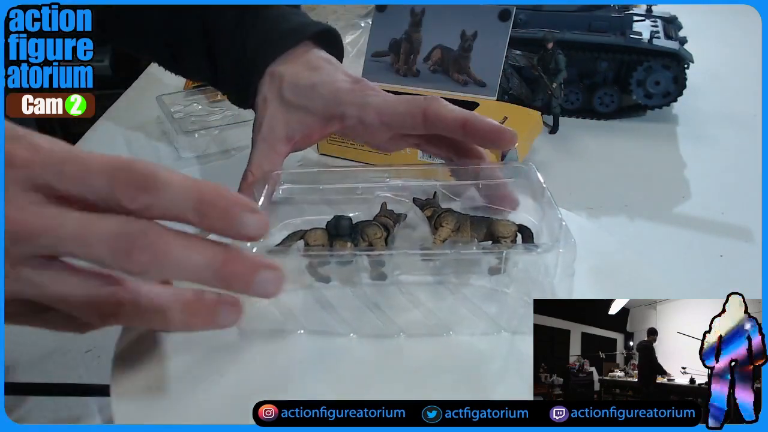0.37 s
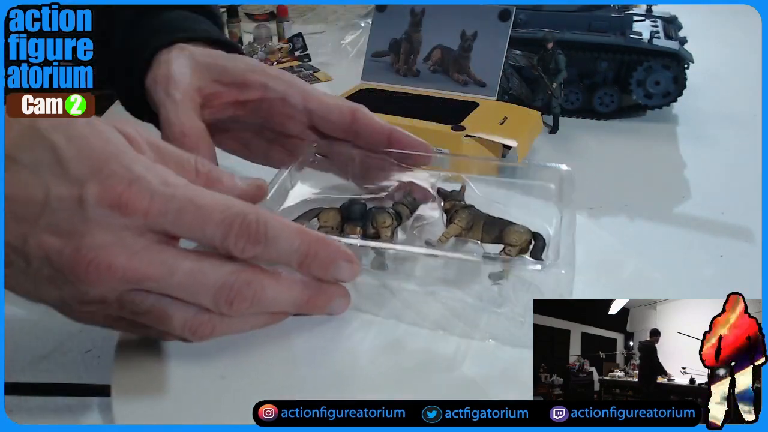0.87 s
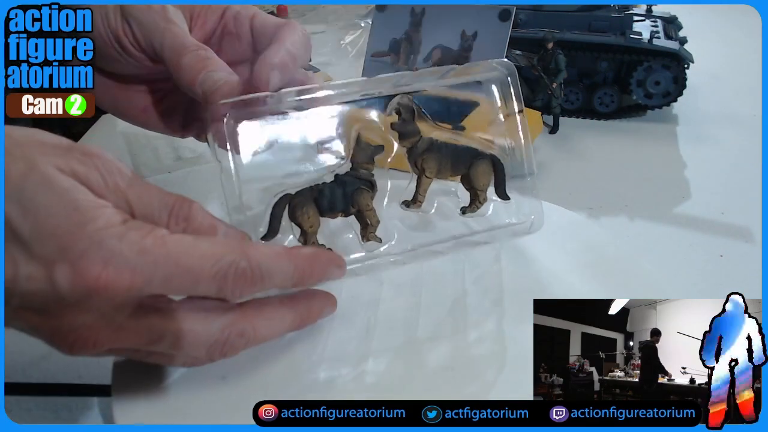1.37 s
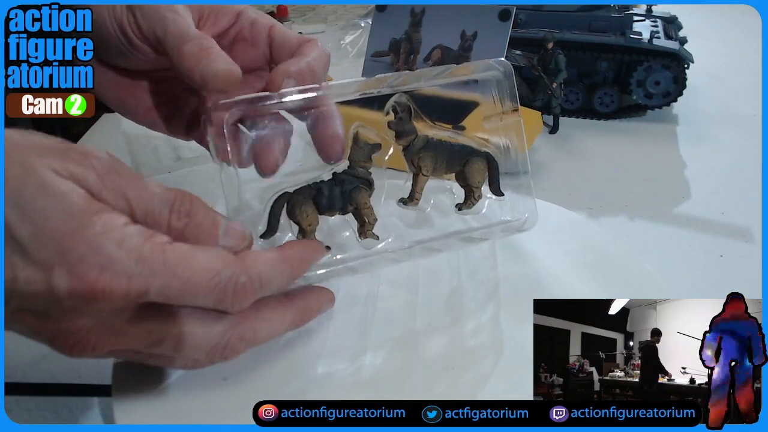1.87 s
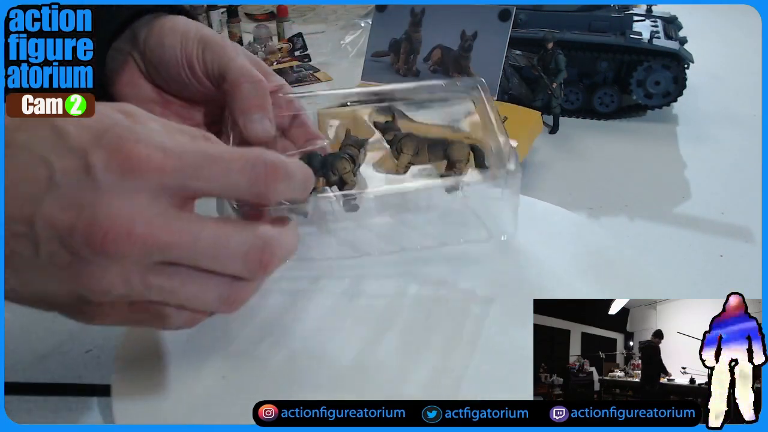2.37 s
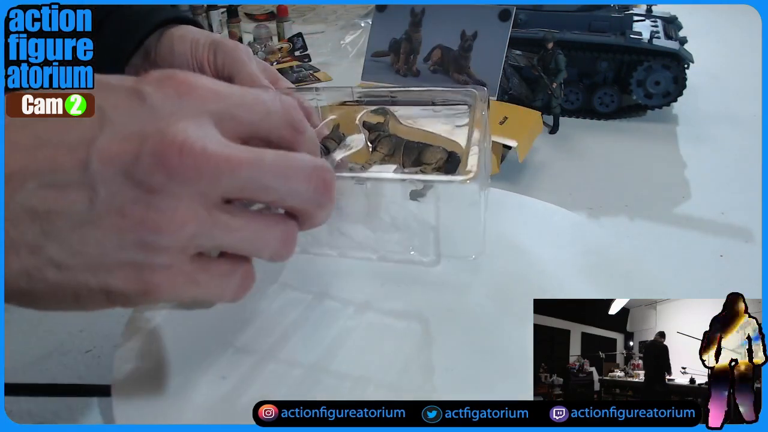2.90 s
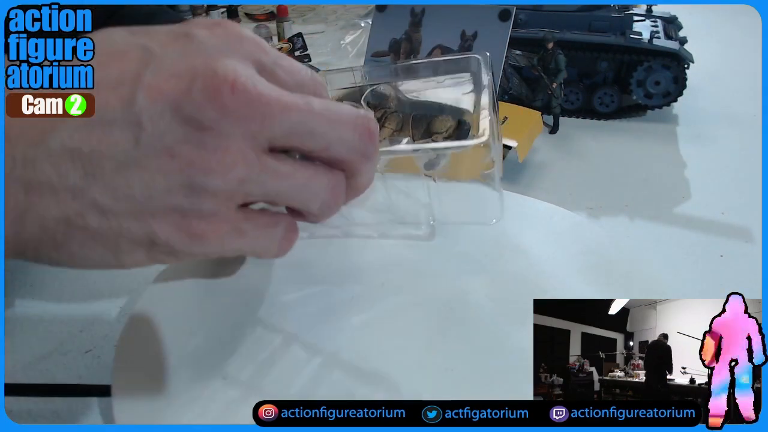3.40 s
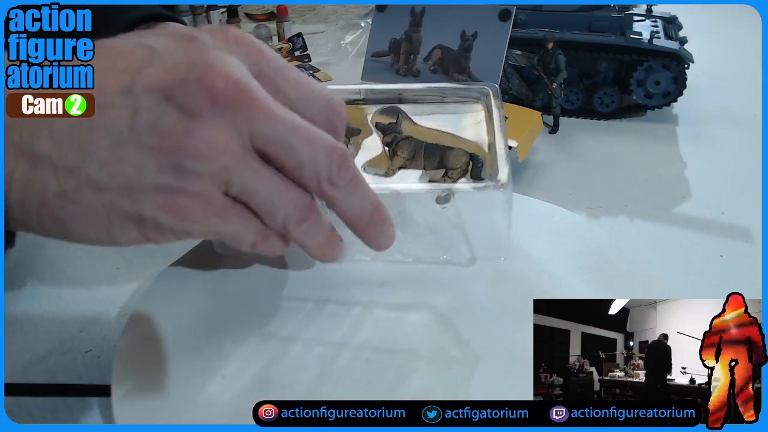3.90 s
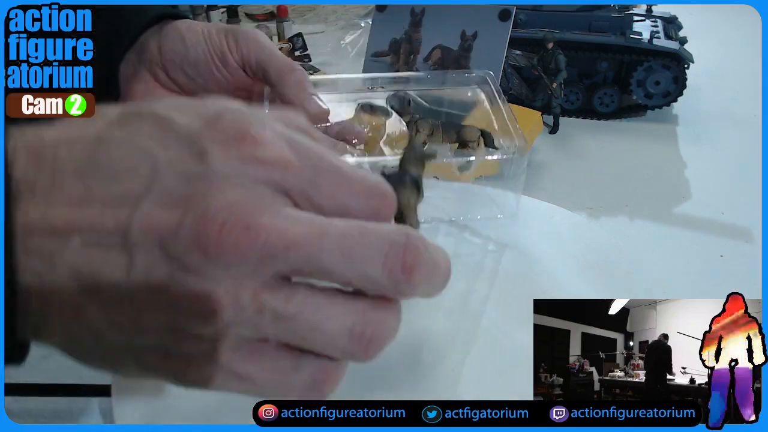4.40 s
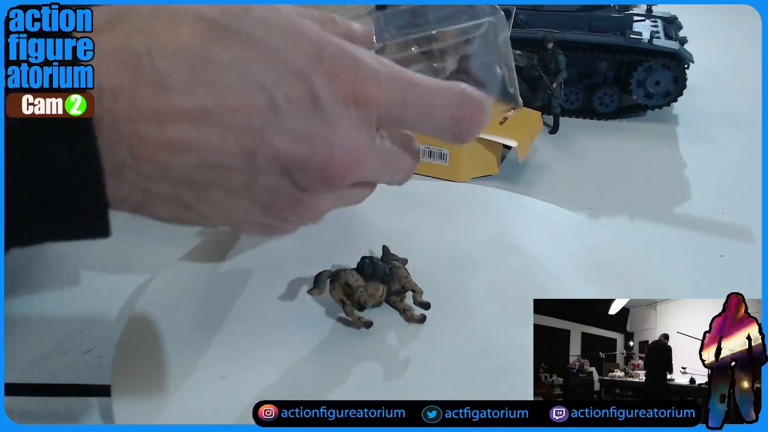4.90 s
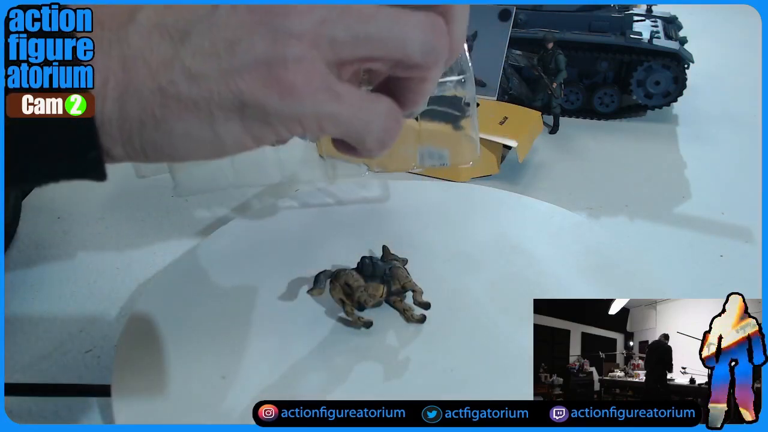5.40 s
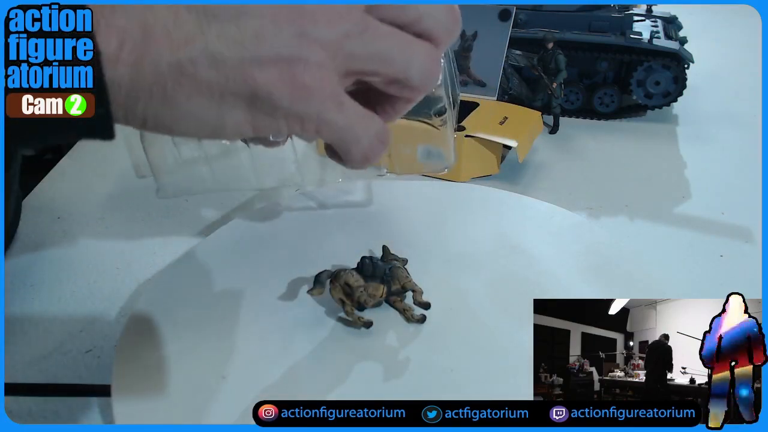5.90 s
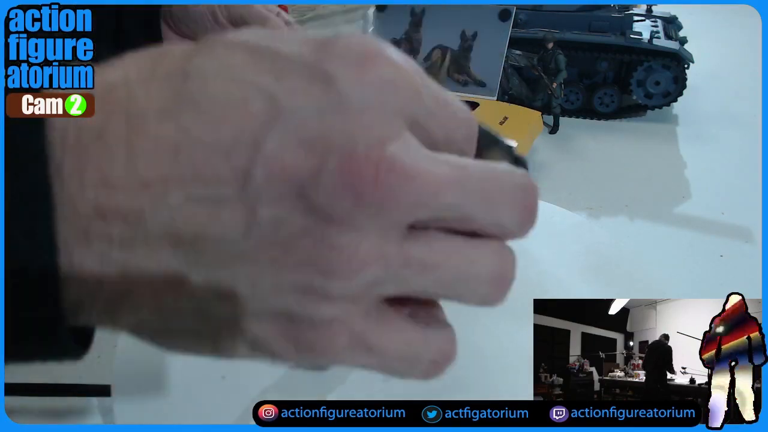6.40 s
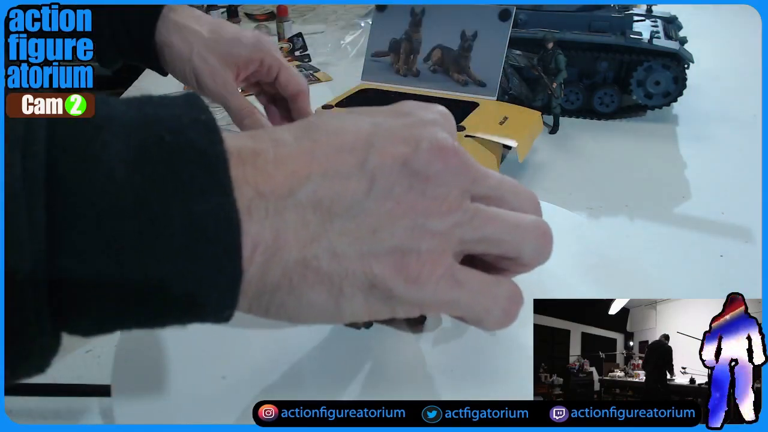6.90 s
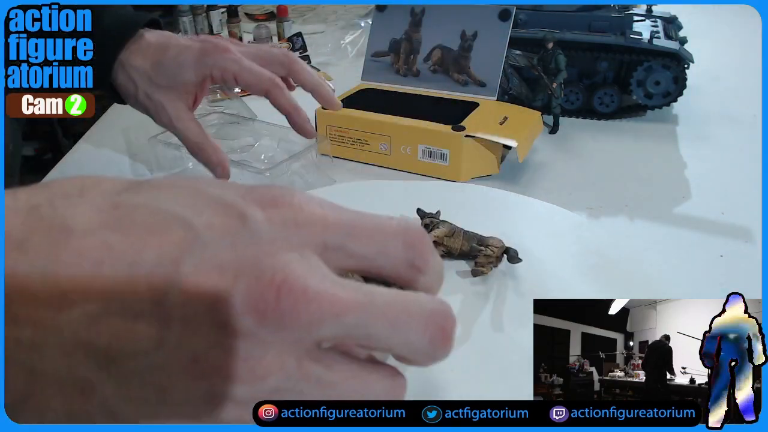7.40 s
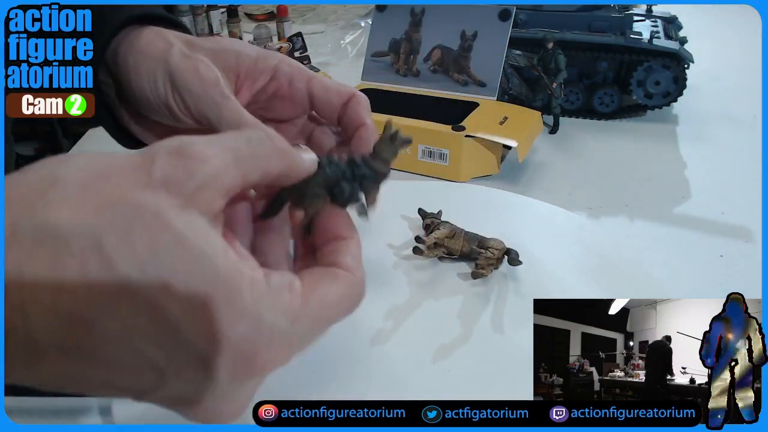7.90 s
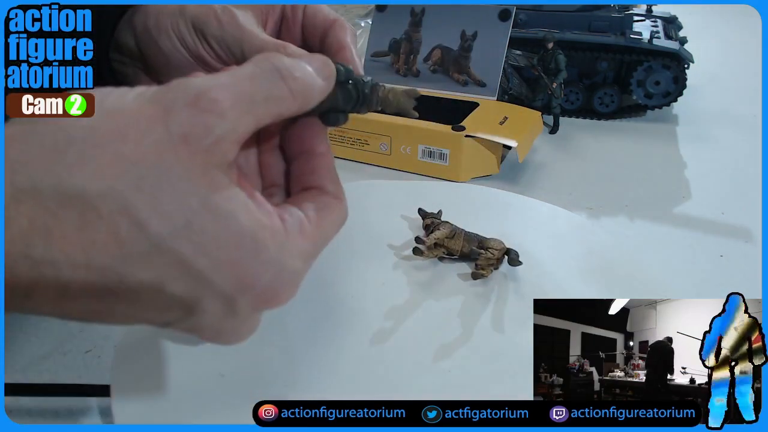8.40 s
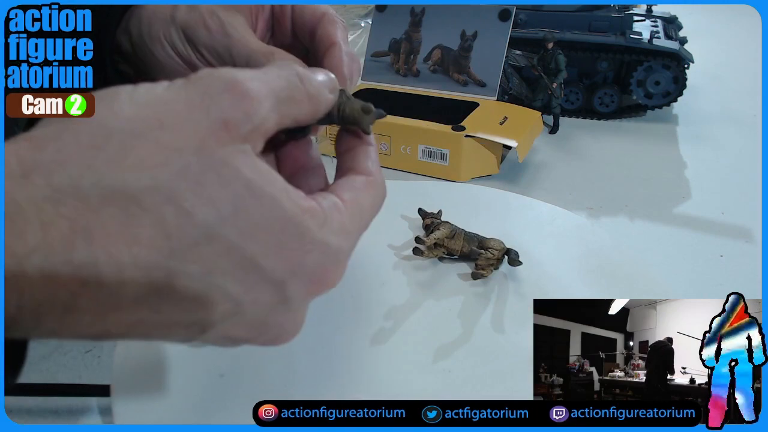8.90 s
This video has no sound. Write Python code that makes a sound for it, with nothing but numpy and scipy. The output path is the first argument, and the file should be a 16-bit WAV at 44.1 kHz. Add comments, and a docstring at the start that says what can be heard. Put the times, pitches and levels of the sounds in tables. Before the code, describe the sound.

Fingers slide over flimsy clear packaging with soft rustling, then flex it into rapid, brittle pops that grow loudest near the middle. A toy is set down with a small hard knock; the tray crackles again with a tiny squeak and its strongest snap. Duller table bumps and scrapes follow, then near quiet with tiny ticks over low hum and hiss, in a small, dry room.

```python
"""A thin moulded plastic tray, flexed by hand over a table close to one microphone, buckles in sharp cracks.
Each crack is a burst of decaying sheet modes; sliding fingers rustle as dense random slips through the same modes.
Small figures are pried out: a stick-slip tone squeaks, table modes knock and a joint ticks in short treble rings.
A small room answers with two wall echoes and a diffuse noise tail.
Behind it lie rumble and hiss made of coloured noise, and a distant hum, a sine that sinks in pitch."""
import sys
import numpy as np
from scipy import signal
from scipy.fft import rfft, irfft
from scipy.io import wavfile

SR = 44100
rng = np.random.default_rng(int(sys.argv[2]) if len(sys.argv) > 2 else 0)


def dump(signal):
    """Clip the signal to [-1, 1] and save it as 16-bit WAV at the path in sys.argv[1]."""
    limited = np.clip(np.atleast_2d(signal).T, -1, 1)
    pcm = np.round(limited * 32767).astype(np.int16)
    wavfile.write(sys.argv[1], SR, pcm)


def voltage_ratio(level):
    """Linear amplitude factor for a level in decibels (scalar or array-like)."""
    return 10 ** (np.asarray(level, float) / 20)


N = 398654
TIME = np.arange(N) / SR


def level(x, db):
    """Scales x to an rms level in dB."""
    return x * voltage_ratio(db) / np.sqrt(np.mean(x ** 2))


def on_log(hz, table):
    """Reads (frequency [Hz], value) points on a log-frequency axis."""
    points_hz, values = np.transpose(table)
    return np.interp(np.log(hz), np.log(points_hz), values)


def coloured(size, table):
    """Noise with the spectrum of (frequency [Hz], level [dB per Hz]) points."""
    hz = np.maximum(np.arange(size // 2 + 1) * SR / size, 1)
    return irfft(rfft(rng.standard_normal(size)) * voltage_ratio(on_log(hz, table)), size)


def walk(per_s):
    """Random levels joined by straight lines."""
    knots = np.arange(0, N / SR + 1, 1 / per_s)
    return 0.84 * np.interp(TIME, knots, rng.standard_normal(len(knots)))


def ring(hz, db, t60, phase, seconds, push_s):
    """Sum of decaying modes that swell during the contact, peak 1."""
    t = np.arange(int(seconds * SR))[:, None] / SR
    modes = voltage_ratio(db - 60 * t / t60) * np.sin(2 * np.pi * hz * t + phase)
    y = modes.sum(axis=1)
    y *= np.sin(np.pi / 2 * np.minimum(t[:, 0] / push_s, 1)) ** 2
    return y / np.abs(y).max()


def add(out, s, y):
    """Lays y into out from time s [s] on."""
    i = int(s * SR)
    out[i:i + len(y)] += y[:len(out) - i]


FOCUS_DB = 5  # loss half an octave away from the centre


def focus(hz, centre_hz):
    """Level [dB] of a mode against one at the centre of the ring: the loss grows with distance, up to a limit."""
    return -FOCUS_DB * np.minimum(4 * np.log2(hz / centre_hz) ** 2, 2.5)


# buckles of the sheet, close to the microphone, treble and edge (3.4-5.4 kHz) before the offsets in cracks():
# (time [s], peak [dB], centre of the ring [Hz], edge [dB], treble [dB])
BUCKLES = [(0.3988, -44, 2130, -9, -19), (0.4145, -31, 2700, -14, -14), (0.9126, -38, 2470, -3, -3),
           (1.3332, -36, 2250, -18, -5), (1.492, -45, 2300, -15, -15), (1.915, -53, 1900, -15, -20),
           (2.2363, -49, 1980, -24, -15), (2.2513, -45, 1980, -23, -13), (2.2734, -31.5, 1830, -6, -12),
           (2.5325, -47, 2050, -18, -9), (2.5776, -42, 1920, -7, -3), (2.789, -34.5, 2470, -5, -13),
           (2.8783, -23, 2660, 1, -5.5), (3.0032, -40, 1570, -31, -30), (3.12, -38, 1970, -20, -16),
           (3.1349, -33, 1960, -9, -18), (3.15, -29, 1970, -7, -15), (3.1646, -30, 1930, -2, -20),
           (3.174, -30, 2020, -7, -15), (3.1912, -34, 1840, -3.5, -18), (3.2015, -36.5, 2550, -9, -14),
           (3.209, -33, 2010, -4, -5), (3.2412, -37, 1640, -9, -12), (3.2637, -26.5, 1530, 12, 6),
           (3.347, -40, 1550, -11, -20), (3.4207, -31.5, 2360, -9, 3.5), (3.4393, -32.5, 1870, -22, -13),
           (3.4513, -33, 1840, -21, -25), (3.4687, -23.5, 2900, -10, -4), (3.4853, -27.5, 1720, -12, -8),
           (3.6252, -35.5, 2460, -15, -11), (3.6408, -24, 2700, -11, -2.5), (3.6719, -27, 2450, 6, 1.5),
           (3.7183, -35.5, 1640, -5, -12), (3.729, -41, 2310, -7, -15), (3.746, -33, 1930, -18, -16),
           (3.7587, -23, 2050, -1, -2.5), (3.813, -40, 1930, -7, -5), (3.84, -30, 2770, 0, -2),
           (3.8646, -28.5, 2000, 2, 1), (3.8808, -30.5, 2150, 1, 6), (3.932, -16.5, 2620, -2, -8),
           (3.9468, -17, 2150, -1, 3.5), (3.9782, -26, 2080, -24, -27), (4.1267, -48, 1650, -20, -21),
           (4.3197, -42, 1770, -11, -21), (4.5543, -26, 1490, -4, -15), (4.6808, -40.5, 1500, 1, 1.5),
           (4.6962, -49, 1380, -7, 7), (4.7291, -25, 2240, -7.5, -19), (4.892, -39, 1750, -22, -16),
           (4.9103, -43, 1780, -23, -1), (4.9607, -41, 2280, -11, -9), (4.978, -35.5, 2090, -16, -18),
           (5.157, -37, 1910, -23, -7), (5.3351, -46, 2280, -18, -16), (5.3775, -44, 2240, -25, -14),
           (5.4608, -40, 1380, -29, -22), (5.5428, -34, 2400, -29, -20), (5.5709, -33, 1860, -20, -20),
           (5.6002, -32.5, 2420, -4, -11), (5.6265, -32.5, 1330, -19, -34), (5.65, -32, 2660, -5, -3),
           (5.691, -37, 1690, -16, -17), (5.7077, -26, 2100, -15, -20), (5.7165, -24.5, 2000, 7.5, 4),
           (5.7459, -38, 1600, -11, -25), (5.791, -48, 2230, -21, -30), (5.8036, -23, 1790, -6.5, -17),
           (5.8279, -32.5, 2350, -22, -16), (5.8795, -33, 1940, -13, -22), (5.9293, -44, 1990, -32, -35),
           (5.938, -44.5, 1980, -23, -34), (5.9441, -45, 1953, -20, -26), (5.9509, -11, 2970, -6, -13),
           (6.0023, -15, 2160, -21, 0.5), (6.014, -28, 2120, -19, -25), (6.0219, -19.5, 2460, -3, -4),
           (6.3156, -36, 1910, -13, -14), (6.4121, -36, 2000, -28, -11), (6.4607, -48, 1900, -14, -10),
           (6.496, -45, 1920, -13, 2), (6.56, -43, 1800, -22, -21), (6.6962, -25.5, 1836, -17, -30),
           (6.829, -19.5, 1310, -31, -36), (6.8705, -33, 1075, -11, -19), (6.9164, -33, 1382, -32, -22),
           (6.9408, -27.5, 1480, -16, -33), (6.958, -41, 1397, -28, -16), (7.045, -39.5, 1930, -4, -23),
           (7.0728, -44, 1340, -27.5, -28)]
# modes of the plastic sheet: (frequency [Hz], relative level [dB], t60 [s])
SHEET_MODES = [(494, 3, 0.0085), (680, 1.5, 0.019), (820, 2.5, 0.016), (1010, -4.5, 0.0219),
               (1227, 4.5, 0.017), (1480, -2.5, 0.034), (1870, 4, 0.008), (2080, 5, 0.013),
               (2400, -2, 0.023), (2713, 2, 0.011), (3018, 1, 0.018), (3580, -0.5, 0.0072),
               (4310, -1.5, 0.0099), (5060, -10.5, 0.014), (5940, -7, 0.01), (6550, -3, 0.0049),
               (7870, -6.5, 0.01), (8800, -4, 0.0073), (9760, -3.5, 0.003), (11530, -12.5, 0.016),
               (11790, -4, 0.0049), (14800, -16, 0.015)]
# a big facet rings low: modes under 1.1 kHz lose level as the centre rises above 1.5 kHz,
# and for each dB of peak above -30 dB
LOW_DB_PER_OCTAVE, LOW_DB_PER_DB = -12.5, -0.62
# faint crackle while the sheet is rubbed: dB over the rub's middle range, scale of its random excess in dB
CRACKLE_DB, CRACKLE_SPREAD_DB = 3, 2.5
SCATTER_DB = 2.5  # random spread of each mode's level


def cracks(rub_db, detune=0.054, edge_db=3.0, treble_db=5.5, low_db=-11.5, count=110):
    """Each buckle snaps another facet: every mode splits in three, shifted; middle ones near its centre lead."""
    out = np.zeros(N)
    hz, db, t60 = np.repeat(np.transpose(SHEET_MODES), repeats=3, axis=1)
    when = rng.random(count) * TIME[-1]
    excess_db = CRACKLE_SPREAD_DB * rng.exponential(size=count)
    centre, edge, treble = rng.standard_normal((count, 3)).T
    crackle_db = np.interp(when, TIME, rub_db) + CRACKLE_DB + excess_db
    crackle = zip(when, crackle_db, 1900 * 2 ** (0.076 * centre), -14 + 7 * edge, -14 + 7 * treble)
    rows = list(BUCKLES) + list(crackle)
    chance = rng.standard_normal((len(rows), 3, len(hz)))
    ranges = [hz < 1100, hz < 3400, hz < 5400]  # low, middle, edge; the rest is treble
    for (s, peak_db, centre_hz, edge, treble), (scatter, shift, phase) in zip(rows, chance):
        low = LOW_DB_PER_OCTAVE * np.log2(centre_hz / 1500) + LOW_DB_PER_DB * (peak_db + 30)
        range_levels = [low + low_db, focus(hz, centre_hz), edge + edge_db]
        colour_db = np.select(ranges, range_levels, treble + treble_db)
        gains_db = db + colour_db + SCATTER_DB * scatter
        facet = ring(hz * (1 + detune * shift), gains_db, t60, np.pi * phase, 0.036, 0.00065)
        add(out, s, voltage_ratio(peak_db) * facet)
    return out


def shelves(hz):
    """Share of a mode in the treble and in the low range of the sheet."""
    high = np.clip(np.log2(hz / 3300) / 0.33, 0, 1)
    low = np.clip(np.log2(1150 / hz) / 0.53, 0, 1)
    return high, low


def rubbed(slips, hz, t60):
    """One mode, a two-pole resonator, driven by the slips, each with a force of its own; rms 1."""
    pole = np.exp(-np.log(1000) / (t60 * SR))
    force = slips * rng.standard_normal(N)
    return level(signal.lfilter([1], [1, -2 * pole * np.cos(2 * np.pi * hz / SR), pole ** 2], force), 0)


SLIPS_PER_S, SLIP_SPREAD_DB = 3000, 2.5
FLEX_DB = 3.5  # depth of each mode's random rise and fall
# a brighter rub rings higher: centre [Hz] where treble equals middle, [Hz] per dB of treble over middle
BRIGHT_HZ, HZ_PER_DB = 3000, 60


def rustle(body, bright, deep, sheet_db=-13.5, treble_db=-5.5, low_db=-14.5, table_db=-15.5):
    """Dense tiny slips of skin and table on plastic ring the sheet; their low part goes into the table top."""
    centre_hz = np.maximum(BRIGHT_HZ + HZ_PER_DB * (bright - body), 1100)
    slips = (rng.random(N) < SLIPS_PER_S / SR) * voltage_ratio(SLIP_SPREAD_DB * rng.exponential(size=N))
    sheet = np.zeros(N)
    for hz, db, t60 in SHEET_MODES:
        high, low = shelves(hz)
        middle = body + sheet_db + 0.52 * focus(hz, centre_hz)
        gain_db = db + (1 - high - low) * middle + high * (bright + treble_db) + low * (deep + low_db)
        damped_t60 = t60 * (1 - .6 * high)  # the fingers damp the upper modes
        mode = rubbed(slips, hz, damped_t60)
        # as the sheet flexes, each mode comes forward and steps back
        sheet += mode * voltage_ratio(gain_db + FLEX_DB * (1 - high / 2) * walk(25))
    board = np.zeros(N)
    for hz, db, t60 in TABLE_MODES[1:]:  # all but the deepest
        board += voltage_ratio(db + focus(hz, 900)) * rubbed(slips, hz, t60)
    return sheet + board * voltage_ratio(table_db + deep)


# the tray jolts, scrapes briefly and settles; levels drive the rustle, treble and low against the level:
# (time [s], hold [s], level [dB], treble [dB], low [dB])
JOLT_EVENTS = [(.405, 0.089, -39, -14.5, -11), (.69, 0.013, -38, -20.5, -9),
               (2.262, 0.021, -46, -14.5, -12), (2.858, .01, -51, -18, -3),
               (3.625, 0.11, -47.5, -15.5, -11.5), (3.748, 0.01, -44.5, -19, -27),
               (3.932, 0.038, -42.5, -16, -35), (4.556, 0.0055, -53, -12, 7), (4.731, 0.014, -51, -20, -2),
               (4.89, .012, -51, -15, -0.5), (4.965, 0.038, -51.5, -17, -5),
               (5.156, 0.015, -50, -13.5, -3.5), (5.374, .014, -57, -21, -2.5),
               (5.455, 0.018, -55, -22, -2), (5.545, .012, -49, -23, 1.5),
               (5.648, 0.0046, -31.5, -19.5, -14), (5.703, 0.01, -45, -17.5, -7.5),
               (5.805, 0.0058, -48, -25, 5), (5.952, 0.031, -54.5, -18, -6), (6.003, 0.029, -53, -2.5, -17),
               (6.195, 0.0077, -56.5, -28, -11), (6.315, 0.0099, -69, -25, -2),
               (6.687, 0.084, -38, -23.5, 0), (6.826, 0.016, -34, -29, 2), (6.94, 0.012, -66.5, -14, 18.5),
               (7.05, 0.014, -67, -15, 2), (7.208, 0.084, -36.5, -20, -4), (7.3, 0.026, -44, -38, 5.5)]
ATTACK_S, ATTACK_PER_HOLD = 0.0059, 0.061  # longer scrapes set in more softly
RELEASE_DB_PER_S, TREBLE_RELEASE_DB_PER_S, LOW_RELEASE_DB_PER_S = 284, 340, 240.5
# fingers slide over the sheet, swelling and fading; levels as for the jolts:
# (time [s], length [s], level [dB], treble [dB], low [dB])
FINGER_SLIDES = [(-.15, 0.25, -63, -22, -3), (0.48, 0.36, -56.5, -18, -1.5),
                 (0.697, 0.34, -52.5, -11.5, -1.5), (0.986, 0.25, -45.5, -11.5, -14),
                 (1.094, .18, -42.5, -9, -8), (1.241, 0.26, -46.5, -13, -8), (1.435, 0.15, -70.5, -3, 1),
                 (1.94, .23, -42.5, -10.5, -28), (2.216, 0.11, -51, -17, -11),
                 (2.253, 0.64, -58.5, -17, -5), (2.87, 0.13, -65, -5, -2.5), (2.96, 0.46, -60.5, -17, -7),
                 (3.194, 0.25, -52, -24, -7.5), (3.413, 0.17, -51, -15, -4), (3.816, .12, -55.5, -8, -27),
                 (4.273, .15, -82, -24, 0), (4.992, 0.22, -61, -13, -12), (5.479, 0.049, -42.5, -24, -10),
                 (5.674, 0.17, -51.5, -25, -5), (5.844, 0.17, -62, -25, -8), (6.382, 0.21, -70.5, -22, 4),
                 (7.408, 0.15, -91, -22.5, 6)]
SLIDE_SKEW = 0.86  # below 1 the swell peaks early
# sharpness of the swell, one row each for middle, treble and low: (exponent [1]); the treble needs speed
SWELL_POWERS = [
    [1.48],
    [2.7],
    [0.96],
]


def rubbing():
    """Drive [dB] of the middle, treble and low range: jolts and slides add up in power."""
    power = np.full((3, N), 1e-11)
    release = np.array([[RELEASE_DB_PER_S], [TREBLE_RELEASE_DB_PER_S], [LOW_RELEASE_DB_PER_S]])
    for s, hold_s, db, treble, low in JOLT_EVENTS:
        i = int(s * SR)
        t = TIME[i:i + SR // 2] - s
        attack_s = ATTACK_S + ATTACK_PER_HOLD * hold_s
        fade = voltage_ratio(-release * np.maximum(t - ATTACK_S - hold_s, 0))
        shape = np.clip(t / attack_s, 0, 1) ** 2 * fade
        power[:, i:i + len(t)] += (shape * voltage_ratio(db + np.array([[0], [treble], [low]]))) ** 2
    for s, length_s, db, treble, low in FINGER_SLIDES:
        progress = np.clip((TIME - s) / length_s, 0, 1) ** SLIDE_SKEW
        shape = np.abs(np.sin(np.pi * progress)) ** np.array(SWELL_POWERS)
        power += (shape * voltage_ratio(db + np.array([[0], [treble], [low]]))) ** 2
    return 10 * np.log10(power)


# a fingertip squeaks over the smooth sheet, before waver and roughness: (time [s], pitch [Hz], level [dB])
SQUEAK_PATH = [(5.866, 1400, -75), (5.882, 1550, -56), (5.915, 1900, -58), (5.94, 2100, -56),
               (5.95, 2150, -80)]


def squeak(waver=0.037, rough_db=2.5):
    """Fast stick and slip: a rising tone, unsteady in pitch and level."""
    s, hz, db = np.transpose(SQUEAK_PATH)
    pitch = np.interp(TIME, s, hz) * (1 + waver * walk(300))
    gain = voltage_ratio(np.interp(TIME, s, db, left=-140, right=-140) + rough_db * walk(190))
    return np.sqrt(2) * gain * np.sin(2 * np.pi * np.cumsum(pitch) / SR)


# figures and tray knock on the table top: (time [s], peak [dB], favoured pitch [Hz], deepest mode [dB])
TABLE_KNOCKS = [(1.15, -39, 327, -11), (3.301, -44.5, 358, -6), (4.555, -23, 550, 7), (4.566, -29, 610, -7),
                (4.728, -35.5, 770, -3), (4.745, -37, 700, -9), (4.77, -41.5, 730, -12),
                (5.498, -41, 360, -4), (6.025, -39.5, 354, -9), (6.694, -29, 760, 1), (6.697, -28, 219, -5),
                (6.795, -33, 731, -9), (6.829, -19, 961, -14.5), (6.868, -45, 942, 4),
                (7.255, -36, 950, 12)]
# modes of the table top, also rung by the rustle: (frequency [Hz], relative level [dB], t60 [s])
TABLE_MODES = [(73, 0, 0.083), (211.6, 6.5, 0.093), (370, -4.5, 0.25), (462, 10.5, 0.017), (531, 7, 0.062),
               (608, 2, 0.0563), (731, -0.5, 0.14), (841, -7.5, 0.2), (958, 9, 0.017), (1245, 8.5, 0.019),
               (1490, -4, 0.066), (2050, 4.5, 0.013)]


def knocks():
    """The board rings at its modes, most near the pitch that the spot favours; each knock sets the deepest."""
    out = np.zeros(N)
    hz, db, t60 = np.transpose(TABLE_MODES)
    for s, peak_db, centre_hz, deep_db in TABLE_KNOCKS:
        gains_db = db + focus(hz, centre_hz)
        gains_db[0] = deep_db
        add(out, s, voltage_ratio(peak_db) * ring(hz, gains_db, t60, 0, .3, 0.00095))
    return out


# a joint of the small figure ticks between the fingers: (time [s], peak [dB])
JOINT_TICKS = [(7.895, -42), (8.053, -54)]


def ticks():
    """Hard little snaps, all treble: 24 random modes die within milliseconds."""
    out = np.zeros(N)
    pitches = rng.uniform(6000, 14500, (len(JOINT_TICKS), 24))
    for (s, peak_db), hz in zip(JOINT_TICKS, pitches):
        add(out, s, voltage_ratio(peak_db) * ring(hz, 0, .004, 0, .01, .0002))
    return out


# nearest walls, against the direct sound: (delay [s], level [dB])
WALL_ECHOES = [(0.0116, -21), (.016, -14.5)]
# decay of the small room: (frequency [Hz], t60 [s])
ROOM_DECAY = [(200, 0.16), (1000, 0.18), (3000, 0.102), (8000, 0.2), (16000, 0.061)]
ROOM_DB, ROOM_START_S = -11, 0.0059  # diffuse tail: energy against the direct sound, onset


def room(x):
    """Two wall echoes and a diffuse tail of noise, each octave decaying at its own rate."""
    t = np.arange(SR // 2) / SR
    tail = np.zeros(len(t))
    for hz in 180 * 2. ** np.arange(7):
        octave = [(hz / 2, -40), (hz / 1.4, -3), (hz, 0), (hz * 1.4, -3), (hz * 2, -40)]
        tail += coloured(len(t), octave) * voltage_ratio(-60 * t / on_log(hz, ROOM_DECAY))
    tail *= np.clip((t - ROOM_START_S) / 0.0095, 0, 1)
    tail *= voltage_ratio(ROOM_DB) / np.sqrt(np.sum(tail ** 2))
    tail[0] = 1  # direct sound
    for delay_s, db in WALL_ECHOES:
        tail[int(delay_s * SR)] += voltage_ratio(db)
    return signal.fftconvolve(x, tail)[:N]


# low rumble under the table scene: (time [s], level [dB])
RUMBLE_LEVEL = [(0.0, -52.5), (0.88, -53.5), (1.33, -53.5), (1.71, -60.5), (2.26, -53.5), (2.6, -45),
                (2.8, -46.5), (3.07, -55.5), (3.5, -52.5), (3.88, -58), (4.56, -57.5), (4.76, -51.5),
                (5.51, -56.5), (5.81, -56), (6.6, -57), (6.87, -51), (7.73, -50.5), (9.04, -62.5)]
# its relative spectrum: (frequency [Hz], level [dB per Hz])
RUMBLE_SPECTRUM = [(12, 4), (20, -1.5), (76, 0.5), (184, -10.5), (226, -10), (416, -18.5), (577, -22),
                   (631, -29), (700, -24), (910, -30), (1540, -120)]
# a distant hum comes and goes: (time [s], level [dB])
HUM_LEVEL = [(5.25, -87), (5.43, -60.5), (5.55, -71), (5.69, -57), (5.74, -70), (5.82, -57), (6.51, -59),
             (6.64, -74), (6.83, -56.5), (7.14, -49.5), (7.41, -61), (7.51, -54.5), (7.94, -53),
             (7.99, -63), (8.34, -61), (8.55, -83), (8.82, -63.5), (9.0, -69.5)]
# its pitch sinks toward a resting value
HUM_REST_HZ, HUM_EXTRA_HZ, HUM_SINK_S = 124.2, 19, 1.7
# relative spectrum of the microphone hiss: (frequency [Hz], level [dB per Hz])
HISS_SPECTRUM = [(120, -30), (200, -4.5), (211, -31.5), (289, -27.5), (322, -12.5), (347, -23),
                 (749, -22.5), (8420, -37.5), (14300, -37.5), (16000, -44.5)]
HISS_DB = -67  # rms


def background():
    """Rumble noise that swells and sinks, a pure low hum and steady hiss."""
    rumble = level(coloured(N, RUMBLE_SPECTRUM), 0) * voltage_ratio(np.interp(TIME, *np.transpose(RUMBLE_LEVEL)))
    s, db = np.transpose(HUM_LEVEL)
    hz = HUM_REST_HZ + HUM_EXTRA_HZ * np.exp(-np.maximum(TIME - s[0], 0) / HUM_SINK_S)
    hum = np.sqrt(2) * np.sin(2 * np.pi * np.cumsum(hz) / SR)
    hum *= voltage_ratio(np.interp(TIME, s, db, left=-120, right=-120))
    hiss = level(coloured(N, HISS_SPECTRUM), HISS_DB)
    return rumble + hum + hiss


def scene():
    """The handled tray in its room, over the background."""
    body, bright, deep = rubbing()
    handling = cracks(body) + ticks() + rustle(body, bright, deep) + knocks() + squeak()
    return (room(handling) + background())[None]


def roll_off(x):
    """The treble ends steeply here."""
    return signal.sosfilt(signal.butter(12, 16650, fs=SR, output="sos"), x)


def record(dry):
    """A steep low-pass cuts the top of the microphone signal."""
    top_hz = 16300
    low_pass = signal.ellip(8, .2, 70, top_hz, fs=SR, output="sos")
    mix = signal.sosfilt(low_pass, dry)
    return roll_off(mix)


dry = scene()
out = record(dry)
dump(out)
```